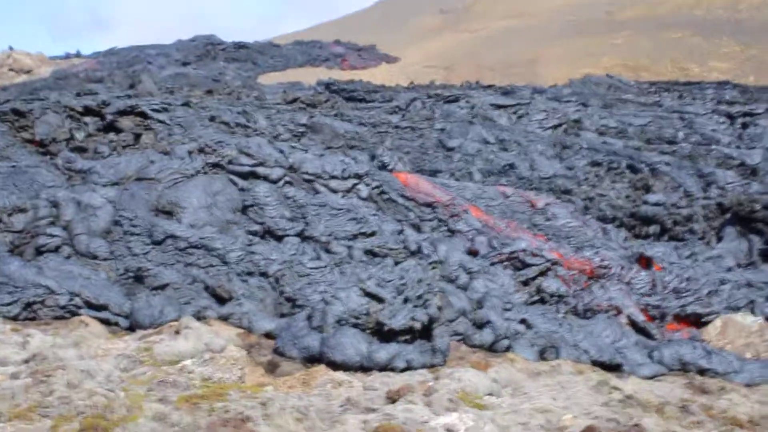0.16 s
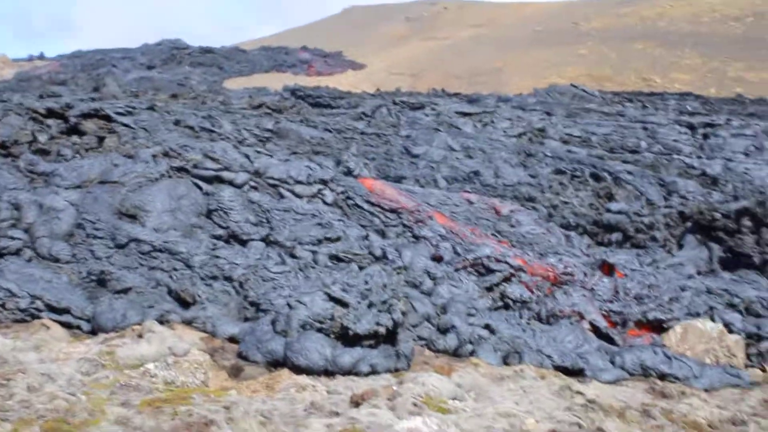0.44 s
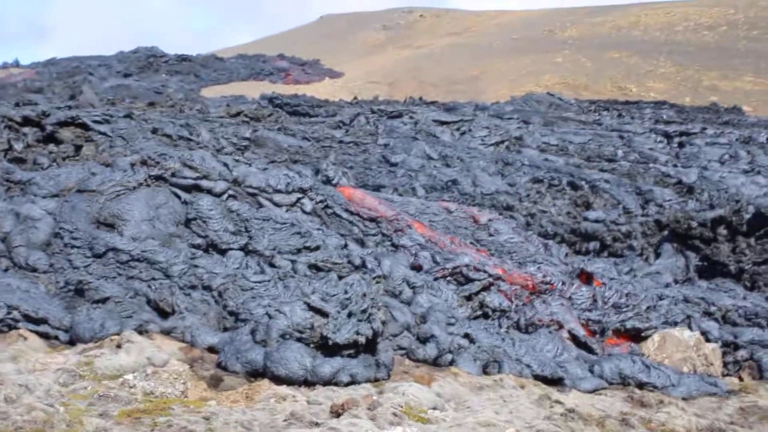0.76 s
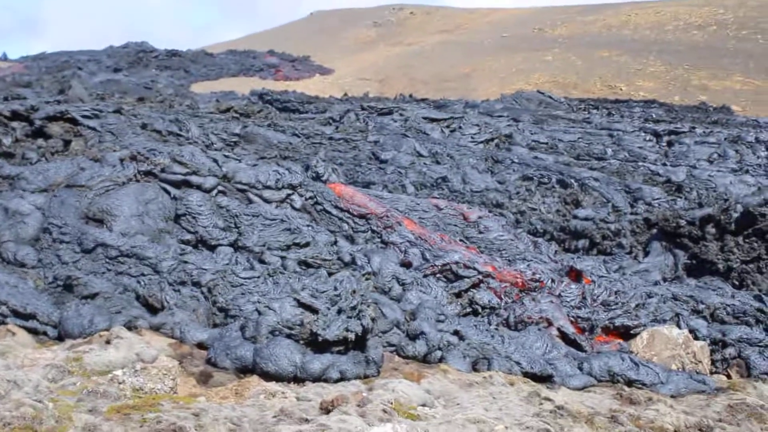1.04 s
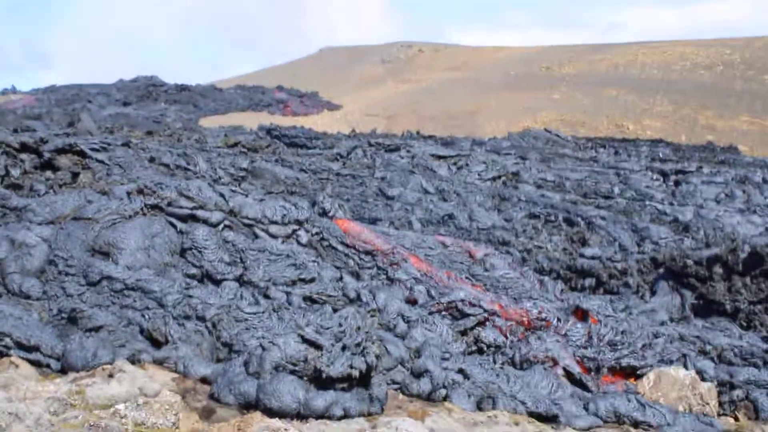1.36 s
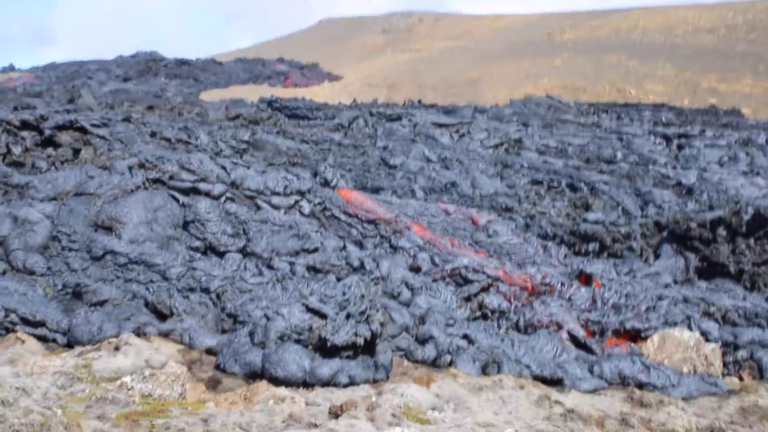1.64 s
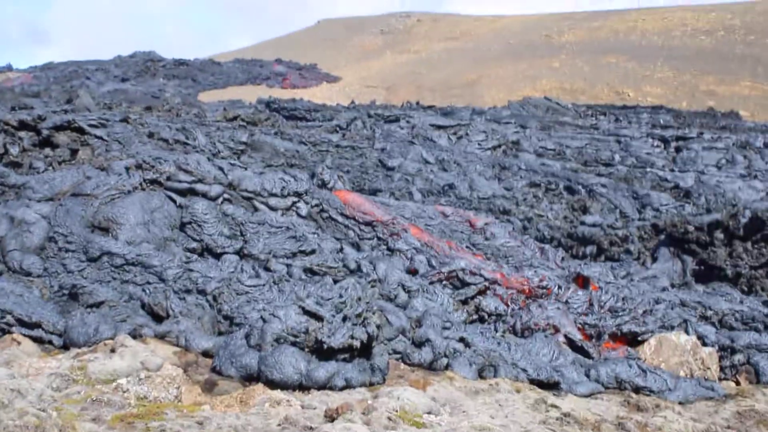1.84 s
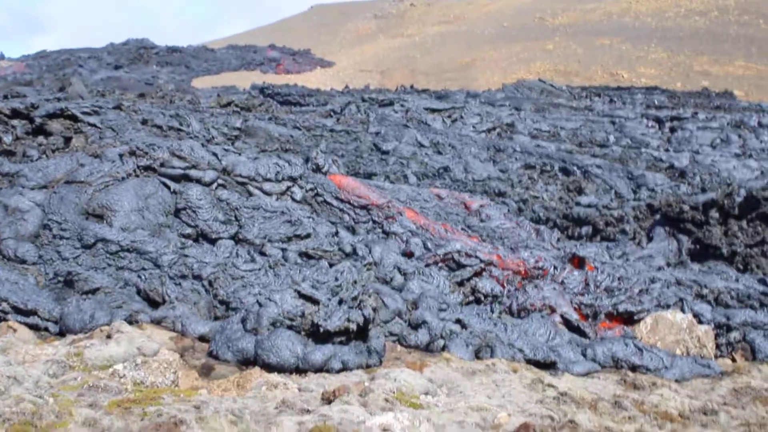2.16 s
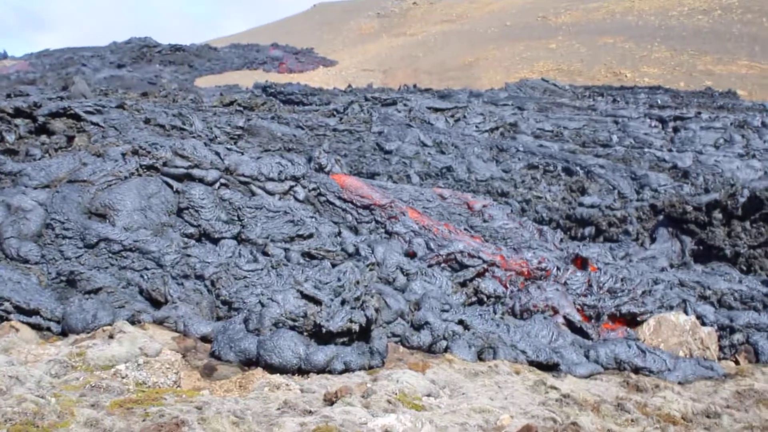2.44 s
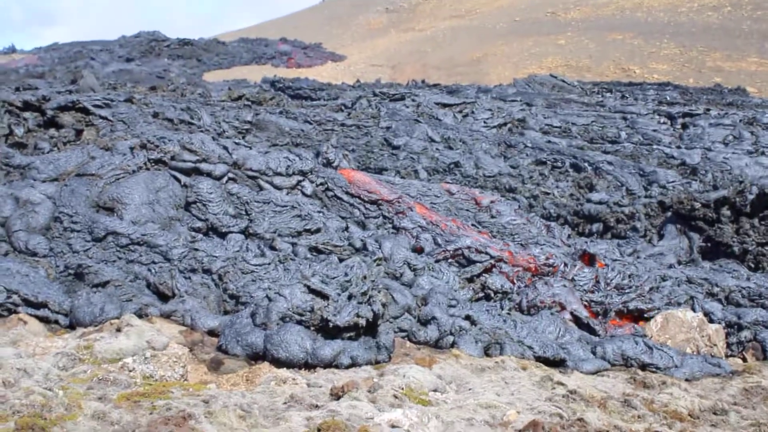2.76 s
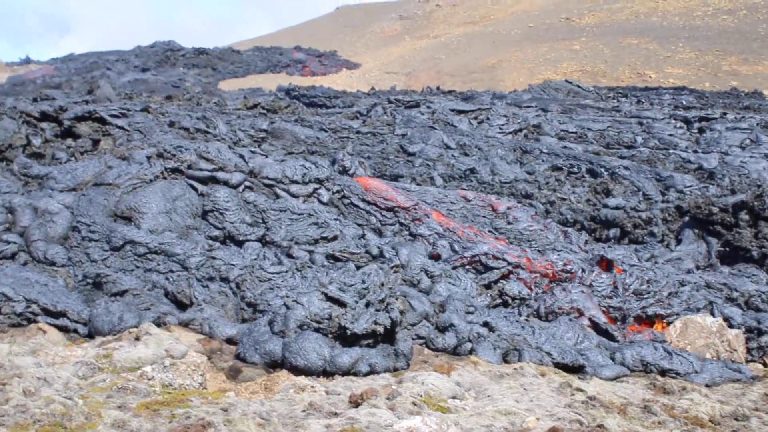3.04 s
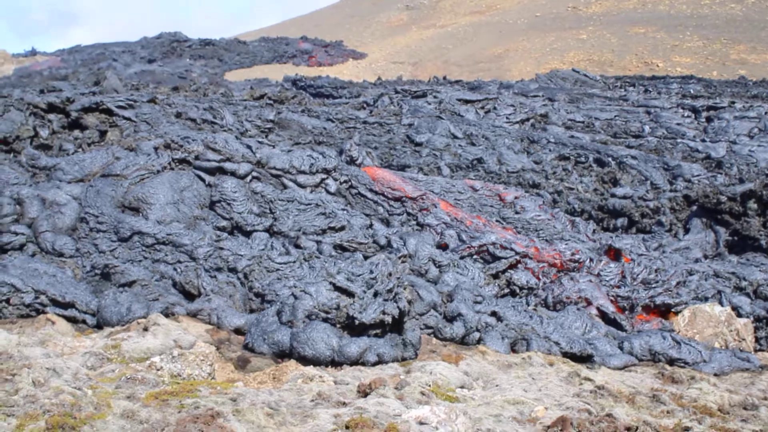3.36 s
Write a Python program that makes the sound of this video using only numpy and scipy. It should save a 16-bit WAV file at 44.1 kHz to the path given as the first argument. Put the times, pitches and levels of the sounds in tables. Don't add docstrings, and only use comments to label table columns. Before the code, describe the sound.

Uneven wind gusts buffet a bare microphone beside a lava flow, thudding hardest around one and a quarter seconds and again past two and a half, with sharp snaps and barely audible crust ticking.

```python
import sys
import numpy as np
from scipy import signal
from scipy.fft import rfft, irfft, next_fast_len
from scipy.io import wavfile
from scipy.ndimage import uniform_filter1d

SR = 44100
rng = np.random.default_rng(int(sys.argv[2]) if len(sys.argv) > 2 else 0)


def makeup_ratio(level_db):
    decades = np.asarray(level_db, float) / 20
    return 10 ** decades


def master_out(mix):
    frames = np.transpose(np.atleast_2d(mix))
    ceiling = np.clip(frames, -1, 1)
    pcm = np.round(ceiling * 32767).astype(np.int16)
    wavfile.write(sys.argv[1], SR, pcm)


N = 154791


def rms_one(x):
    return x / np.sqrt(np.mean(x ** 2) + 1e-20)


def band(x, low_hz, high_hz, order=2):
    return signal.sosfilt(signal.butter(order, [low_hz, high_hz], "band", fs=SR, output="sos"), x)


def drift(rate_hz):
    r = np.exp(-2 * np.pi * rate_hz / SR)
    noise = rng.standard_normal(N + 9000)
    return rms_one(signal.lfilter([1], [1, -2 * r, r * r], noise)[9000:])


def ring(clicks, hz, t60_s):
    r, w = makeup_ratio(-60 / (t60_s * SR)), 2 * np.pi * hz / SR
    return signal.lfilter([0, np.sin(w)], [1, -2 * r * np.cos(w), r * r], clicks + 1e-18)


def sparse(per_s, spread_db):
    size_db = spread_db * np.minimum(rng.exponential(1, N), 4)
    sizes = makeup_ratio(size_db) * rng.choice([-1, 1], N)
    return sizes * (rng.random(N) < per_s / SR)


# (frequency [Hz], level [dB per Hz])
TURBULENCE = [
    (25, -10.5),
    (100, 4.5),
    (250, -0.5),
    (600, -9.5),
    (1500, -28.5),
    (4000, -57),
    (9000, -62),
    (30000, -120),
]


def turbulence_power(hz, octaves):
    point_hz, point_db = np.array(TURBULENCE).T
    level_db = np.interp(np.log2(hz) - octaves, np.log2(point_hz), point_db)
    return makeup_ratio(2 * level_db) / 2 ** octaves / 380


# (centre [s], length [s], level [dB], speed [octaves])
EDDIES = [(0.016, 0.025, -21.5, 2.2), (0.047, 0.018, -18.5, 0.6), (0.075, 0.019, -28, 1.5),
          (0.114, 0.0093, -17.5, 3.5), (0.174, 0.0056, -21, 11), (0.193, 0.019, -30.5, 0.5),
          (0.249, 0.0021, -40.5, 1.54), (0.278, 0.049, -16.5, -0.04), (0.305, 0.014, -23.5, 2.5),
          (0.326, 0.017, -17.5, 0.9), (0.365, 0.026, -24.5, 2), (0.394, 0.022, -27.5, 2),
          (0.471, 0.0025, -23, 0.4), (0.525, 0.004, -27.5, 0.7), (0.568, 0.038, -17, 0.29),
          (0.575, 0.0093, -29.5, 10), (0.603, 0.045, -13.5, -0.04), (0.632, 0.0098, -22, 0.84),
          (0.668, 0.025, -15.5, 1.72), (0.722, 0.016, -22, 0.06), (0.752, 0.052, -22, 0.56),
          (0.816, 0.036, -27, 1), (0.851, 0.02, -18.5, 0.23), (0.88, 0.0096, -19.5, 1.43),
          (0.894, 0.018, -28.5, 1.1), (0.952, 0.039, -15.5, 1.22), (1.007, 0.0071, -14, 0.66),
          (1.06, 0.048, -13, 0.63), (1.09, 0.037, -24, 0.95), (1.106, 0.064, -20, 0.63),
          (1.14, 0.012, -15.5, 0.42), (1.171, 0.016, -16, 0.38), (1.197, 0.018, -33.5, 1),
                 (1.249, 0.03, -6, -0.03), (1.294, 0.039, -16, 0.95), (1.327, 0.018, -26.5, 1.26),
                 (1.381, 0.0066, -22.5, 2.5), (1.402, 0.013, -17, 2), (1.45, 0.082, -17, -0.57),
                 (1.459, 0.025, -21.5, 0.87), (1.522, 0.04, -24, 0.24), (1.596, 0.02, -19.5, 0.46),
                 (1.64, 0.0099, -21.5, -0.8), (1.688, 0.048, -17, 0.66), (1.722, 0.1, -20, 0.1),
                 (1.753, 0.028, -19.5, 1.2), (1.783, 0.047, -18.5, -0.04), (1.832, 0.077, -18.5, 0.47),
                 (1.858, 0.021, -25, 2), (1.916, 0.089, -17, 0.13), (1.919, 0.022, -23, 1.5),
                 (1.976, 0.026, -19, 0.04), (2.057, 0.016, -24.5, 2), (2.17, 0.055, -15, -0.62),
                 (2.198, 0.055, -15, 0.2), (2.247, 0.03, -15, -0.1), (2.285, 0.0058, -10.5, 0.55),
                 (2.304, 0.064, -18, -0.95),
          (2.392, 0.024, -19.5, -0.24), (2.46, 0.037, -15, -0.13), (2.499, 0.071, -13, 0.42),
               (2.538, 0.02, -17, 0.26), (2.578, 0.037, -9.5, -0.29), (2.598, 0.019, -10, 0.19),
               (2.625, 0.058, -10, 1.01), (2.663, 0.016, -25, 0.8), (2.725, 0.091, -11, 0.61),
               (2.734, 0.047, -16.5, 2.25), (2.782, 0.034, -21, 1.55), (2.868, 0.044, -23, 0.27),
               (2.902, 0.017, -20.5, 0.71), (2.938, 0.04, -21.5, -0.63), (2.997, 0.0095, -24, -0.23),
               (3.014, 0.012, -16, -0.57), (3.044, 0.014, -23, -0.026), (3.073, 0.046, -21, 0.33),
               (3.091, 0.053, -26.5, 0.3), (3.161, 0.046, -20.5, 0.47), (3.205, 0.017, -30, 1.3),
               (3.234, 0.039, -18.5, 1), (3.275, 0.022, -15, 1.58), (3.304, 0.029, -20, 0.88),
               (3.34, 0.06, -18.5, -0.15), (3.396, 0.031, -19.5, 0.64), (3.448, 0.073, -20, 0.49),
               (3.47, 0.0083, -9.5, -0.076), (3.505, 0.016, -18, 1.73)]
# (time [s], level [dB], speed [octaves])
FLOW = [
    (0, -20.5, -1.13),
    (.45, -25, -1.67),
    (1.15, -19.5, -1.06),
    (1.6, -30.5, -1.13),
    (2.1, -20, -1.22),
    (2.399, -31, -1.3),
    (2.9, -37.5, -0.028),
    (3.51, -27.5, -1.6),
]
# (time [s], speed gain [octaves])
SPURTS = [(0.0156, 0.58), (0.0502, 0.81), (0.0583, 0.92), (0.0765, 1.16), (0.1159, 1.3),
          (0.1734, 1.36), (0.2001, 1.01), (0.249, 1.38), (0.3043, 0.92), (0.3204, 0.72),
          (0.3296, 0.72), (0.3566, 0.63), (0.3657, 0.65), (0.3929, 1.28), (0.3994, 0.69),
          (0.4702, 1.7), (0.5264, 1.59), (0.5504, 1.18), (0.575, 0.73), (0.5822, 0.82),
          (0.6019, 1.06), (0.6063, 0.71), (0.6294, 1.3), (0.6741, 1.07), (0.691, 0.88),
          (0.7555, 0.99), (0.8072, 1.52), (0.8096, 0.87), (0.8145, 0.54), (0.8613, 1.0),
          (0.8764, 1.13), (0.8937, 1.11), (0.9039, 0.81), (0.941, 1.09), (0.9474, 0.57),
          (0.955, 0.72), (1.0028, 1.52), (1.0438, 0.77), (1.0657, 0.74), (1.092, 0.51), (1.101, 0.83),
          (1.1187, 1.01), (1.1439, 0.94), (1.1647, 0.68), (1.1738, 1.25), (1.2048, 0.92),
          (1.2536, 0.5), (1.3257, 0.77), (1.3861, 1.46), (1.4108, 1.1), (1.438, 1.13), (1.4572, 0.96),
          (1.4678, 0.61), (1.4853, 1.9), (1.514, 1.5), (1.6017, 0.81), (1.64, 1.3), (1.6817, 0.53),
               (1.7448, 0.7), (1.7503, 0.48), (1.7644, 1.4), (1.7826, 1.06), (1.8211, 0.65), (1.8276, 0.59),
               (1.8642, 0.46), (1.8692, 0.78), (1.9293, 1.1), (2.0368, 2.2), (2.0567, 1.3), (2.1939, 0.86),
               (2.2089, 1.5), (2.2416, 1.2), (2.283, 0.9), (2.395, 0.71), (2.452, 0.63), (2.4883, 0.71),
               (2.513, 1.17), (2.5343, 1.1), (2.5765, 0.64), (2.603, 0.5), (2.6222, 0.19), (2.6593, 0.55),
               (2.7253, 0.35), (2.7338, 0.26), (2.748, 0.42), (2.7778, 0.66), (2.7905, 1.3), (2.7975, 0.54),
               (2.8606, 0.82), (3.0394, 1.5), (3.0823, 0.76), (3.1023, 1.3), (3.1592, 1.03), (3.2315, 1.2),
               (3.2769, 1.2), (3.2831, 0.78), (3.2965, 0.73), (3.3039, 0.8), (3.3903, 0.79), (3.4391, 1.2),
               (3.4436, 0.9), (3.459, 0.78), (3.4663, 1.1), (3.4876, 2.6),
          (0.027, 1.2), (.1105, 1.5), (.123, 0.69), (0.281, 0.63), (1.296, 0.56), (1.69, .7),
                 (2.1989, 0.55), (2.6334, 0.52), (2.7135, 0.27), (2.739, 0.43), (3.152, .7)]
CONTROL_STEP = 16
EDDY_TRIM_DB, EDDY_SAG_OCTAVES, FASTEST_OCTAVES = -2, .45, 2.9
EDDY_SPREAD, EDDY_RISE_SHARE, EDDY_LOW_LAG_CYCLES, EDDY_BLUR_S = .45, .65, .3, .0005
SLIP_OCTAVES, SLIP_PER_S, SLIP_SKEW, SLIP_MEMORY_STEPS = .26, 260, .35, 70
SPURT_S, SPURT_REACH, SPURT_KINK_DB = 0.0015, 0.87, 20.5
KINKS_PER_S, KINK_SPREAD_DB, KINK_SHARE = 1100, 2.0, .6
LOWEST_HZ, BANDS, PORT_HZ = 30, 19, 2850


def speed_slip(t, spurt_s, gain):
    flutter = np.exp(SLIP_SKEW * drift(SLIP_PER_S)[::CONTROL_STEP])
    flutter = SLIP_OCTAVES * rms_one(flutter - uniform_filter1d(flutter, size=SLIP_MEMORY_STEPS))
    bursts = gain[:, None] * np.exp(-((t - spurt_s[:, None]) / SPURT_S) ** 2)
    spurts = SPURT_REACH * np.sum(bursts, axis=0)
    return flutter + spurts - uniform_filter1d(spurts, size=SLIP_MEMORY_STEPS)


def pressure_stream(spurt_s):
    fronts = np.zeros(N)
    fronts[(spurt_s * SR).astype(int)] = makeup_ratio(SPURT_KINK_DB) * (-1) ** np.arange(len(spurt_s))
    kinks = np.sqrt(KINK_SHARE) * rms_one(sparse(KINKS_PER_S, KINK_SPREAD_DB))
    return fronts + kinks + np.sqrt(1 - KINK_SHARE) * rng.standard_normal(N)


def wind():
    t = np.arange(0, N, CONTROL_STEP) / SR
    s, length, db, speed = np.transpose(EDDIES)[:, :, None]
    flow_s, flow_db, flow_speed = np.transpose(FLOW)
    spurt_s, gain = np.transpose(SPURTS)
    slip = speed_slip(t, spurt_s, gain)
    swell = makeup_ratio(1.5 * drift(150)[::CONTROL_STEP])
    flow_power = makeup_ratio(2 * np.interp(t, flow_s, flow_db))
    flow_octaves = np.interp(t, flow_s, flow_speed) + slip
    size = next_fast_len(N)
    stream = rfft(pressure_stream(spurt_s), size)
    place = 2 * np.log2(np.linspace(1, SR / 2, len(stream)) / LOWEST_HZ)
    rise = np.where(t < s, EDDY_RISE_SHARE, 1)
    out = np.zeros(N)
    for k in range(BANDS):
        hz = LOWEST_HZ * 2 ** (k / 2)
        width_s = EDDY_SPREAD * length * rise + EDDY_LOW_LAG_CYCLES / hz + EDDY_BLUR_S
        off = ((t - s) / width_s) ** 2
        bell = np.exp(-off)
        near = bell > 1e-5
        octaves = np.minimum(speed, FASTEST_OCTAVES) + slip - EDDY_SAG_OCTAVES * off
        power = np.zeros(bell.shape)
        power[near] = (bell * makeup_ratio(2 * (db + EDDY_TRIM_DB)))[near] * turbulence_power(hz, octaves[near])
        power = power.sum(0) + flow_power * turbulence_power(hz, flow_octaves)
        port_loss = 1 + (hz / PORT_HZ) ** 4
        strength = swell * np.sqrt(power * SR / 2 / port_loss)
        part = irfft(stream * np.clip(1 - abs(place - k), 0, 1), size)[:N]
        out += part * np.interp(np.arange(N) / SR, t, strength)
    return out


def surge():
    lumps = rms_one(band(rng.standard_normal(N), 24.3, 108))
    return makeup_ratio(-37 + 2.2 * drift(20)) * lumps


def crackle():
    fine = sparse(1900, 4.0) * makeup_ratio(-63.5 + 4.6 * drift(25))
    hiss = makeup_ratio(-72.5 + 2.0 * drift(3)) * rng.standard_normal(N)
    air = makeup_ratio(-93.5) * np.diff(rng.standard_normal(N + 2), 2)
    return band(fine + hiss, 4700, 8400) + air


# (centre [s], peak [dB], pitch [Hz])
BOOMS = [
    (0.115, -7, 258),
    (1.0615, -4.5, 239),
    (1.253, -1.5, 233.4),
    (1.293, -1.5, 293),
    (2.208, -3.5, 300),
]
BOOM_CYCLES = 0.88


def booms():
    s, db, hz = np.transpose(BOOMS)[:, :, None]
    turns = (np.arange(N) / SR - s) * hz
    swell = makeup_ratio(db) * np.exp(-(turns / BOOM_CYCLES) ** 2)
    return np.sum(-swell * np.cos(2 * np.pi * turns), axis=0)


# (time [s], peak [dB], width [ms])
SNAPS = [(0.25, -16, 0.14), (0.429, -31.5, 0.061), (0.546, -14, 0.2), (0.806, -6.5, 0.11),
         (0.81, -14.5, 0.092), (0.817, -15, 0.16), (1.0032, -3, 0.34), (1.438, 0, 0.26), (1.93, -2, 0.097),
         (2.7255, -5, 0.054), (3.083, -2.5, 0.21), (3.2772, 1, 0.28), (3.457, -2.5, 0.21)]


def snaps():
    out = np.zeros(N)
    for s, db, width_ms in SNAPS:
        start = int(s * SR)
        u = np.arange(300) / SR * 1000 / max(width_ms, .03)
        out[start:start + 300] += makeup_ratio(db) * (u / 2) ** 2 * np.exp(2 - u)
    return out


# (time [s], peak [dB])
TICKS = [(0.4154, -53), (0.532, -50), (1.337, -34), (2.0128, -51), (2.0798, -45.5), (2.1284, -50),
         (2.2378, -42.5), (2.3321, -52), (2.5437, -50.5), (2.805, -57), (3.0984, -55)]
TICK_LOW_HZ, TICK_HIGH_HZ, TICK_T60_S, TICK_TRIM_DB = 3460, 9500, .007, -12


def ticks():
    out = np.zeros(N)
    s, db = np.transpose(TICKS)
    luck = rng.normal(0, 1, (len(s), 10))
    for k, hz in enumerate(np.geomspace(TICK_LOW_HZ, TICK_HIGH_HZ, 10)):
        clicks = np.zeros(N)
        clicks[(s * SR).astype(int)] = makeup_ratio(db + TICK_TRIM_DB + 3.5 * luck[:, k]) * (-1) ** k
        out += ring(clicks, hz, TICK_T60_S)
    return out


def flake():
    click = makeup_ratio(-76) * (np.arange(N) == int(1.605 * SR))
    return ring(click, 3900, .15) + ring(click, 5580, .15)


def scene():
    return (wind() + surge() + crackle() + booms() + snaps() + ticks() + flake())[None]


def band_limit(x):
    return signal.sosfilt(signal.butter(12, 15830, fs=SR, output="sos"), x)


# (time [s], length [s])
CHOKES = [(.063, .008), (.127, .005), (.2025, .0055), (.218, .02), (1.109, .006), (1.362, .0135),
          (1.397, .0105), (1.4405, .002), (1.449, .005), (2.7565, .003), (2.762, .007)]
MIC_ROLL_HZ, COUPLING_HZ, CLIP_LEVEL = 8800, 79.6, 0.93


def record(dry):
    passing = np.ones(N)
    for s, length in CHOKES:
        passing[int(s * SR):int((s + length) * SR)] = 0
    dull = signal.sosfilt(signal.butter(3, MIC_ROLL_HZ, fs=SR, output="sos"), dry)
    changes = np.diff(dull, prepend=0) * uniform_filter1d(passing, size=9)
    coupled = signal.lfilter([1], [1, -np.exp(-2 * np.pi * COUPLING_HZ / SR)], changes)
    mix = np.clip(coupled, -CLIP_LEVEL, CLIP_LEVEL)
    return band_limit(mix)


dry = scene()
out = record(dry)
master_out(out)
```